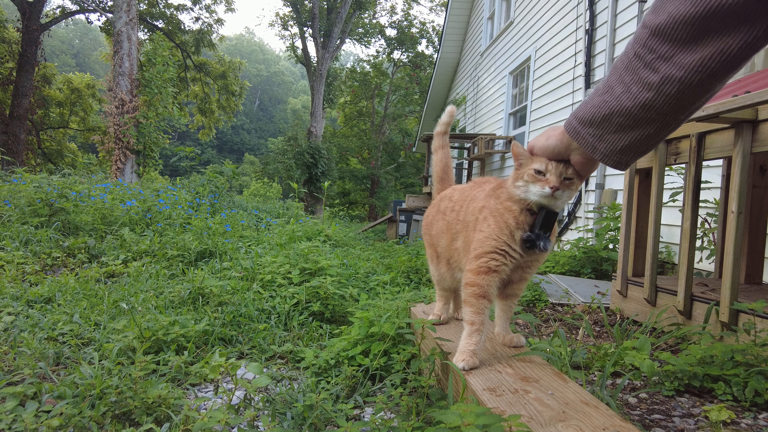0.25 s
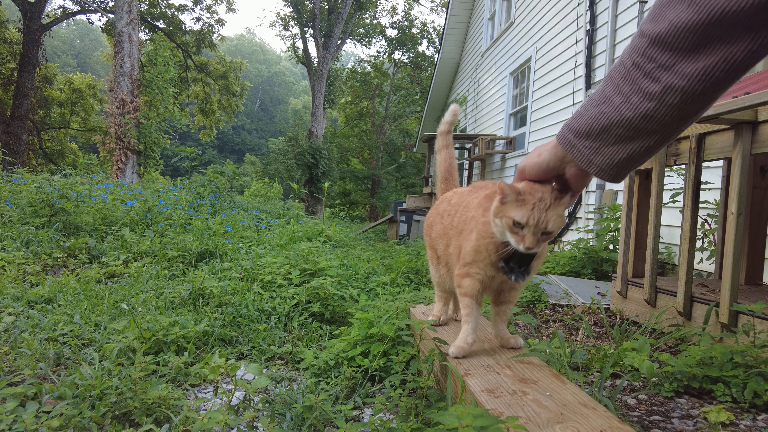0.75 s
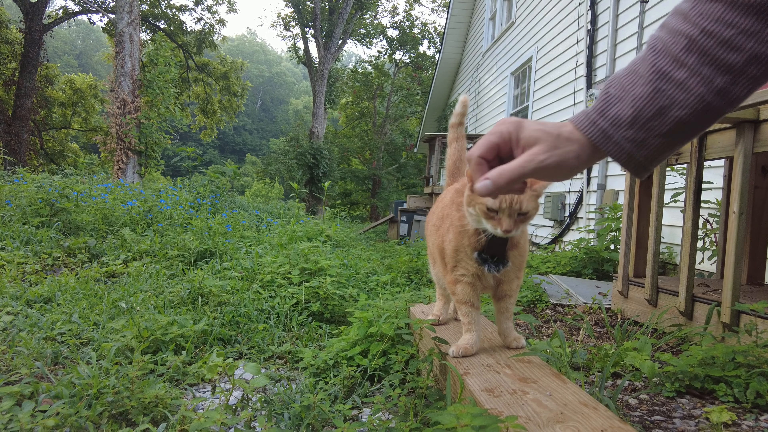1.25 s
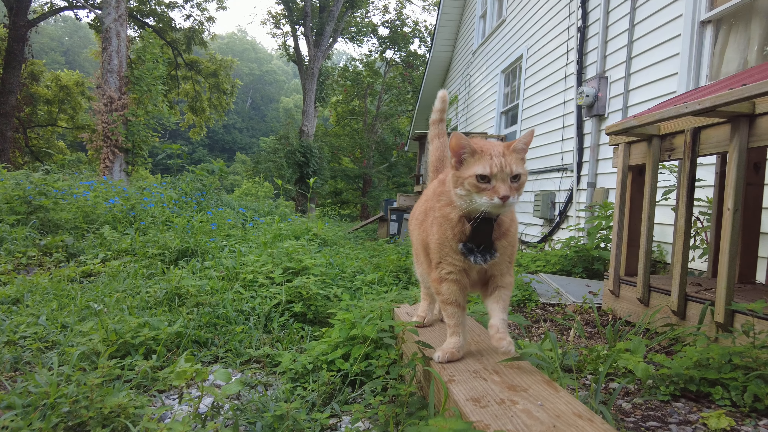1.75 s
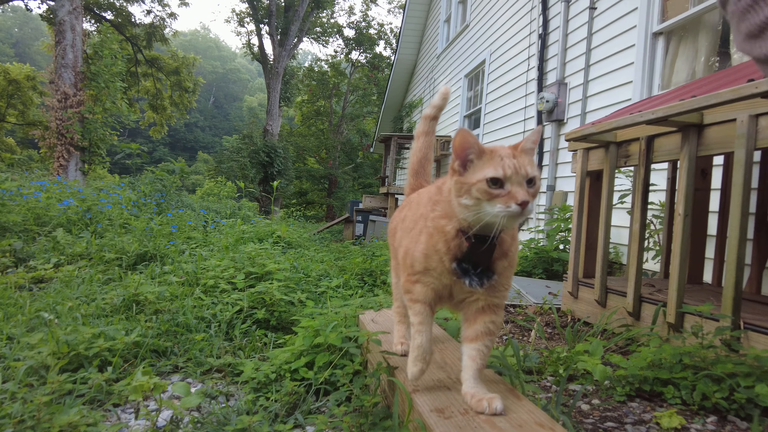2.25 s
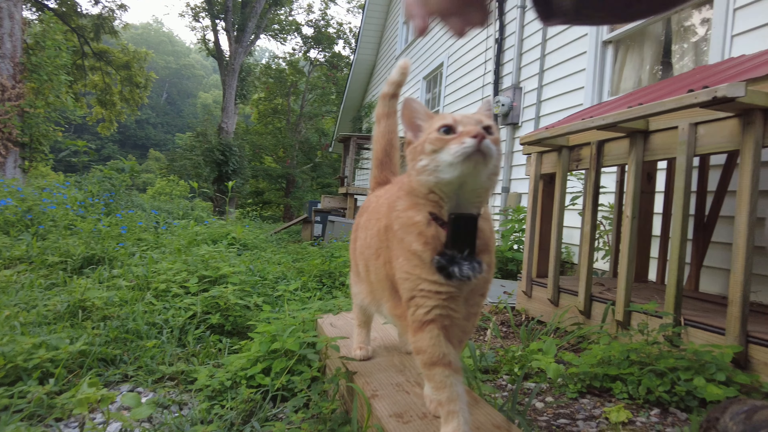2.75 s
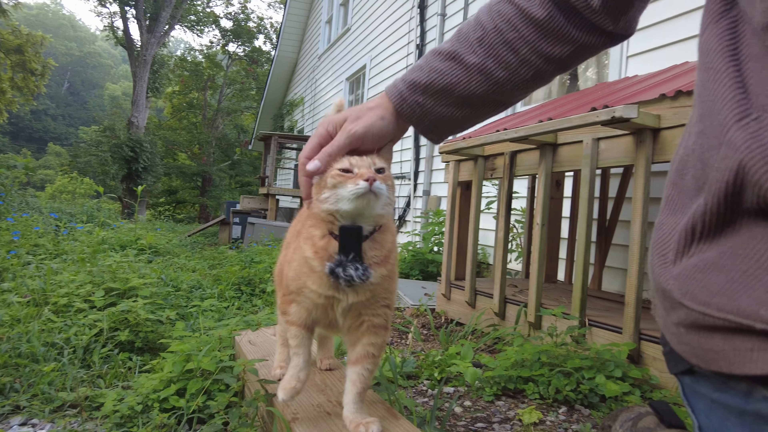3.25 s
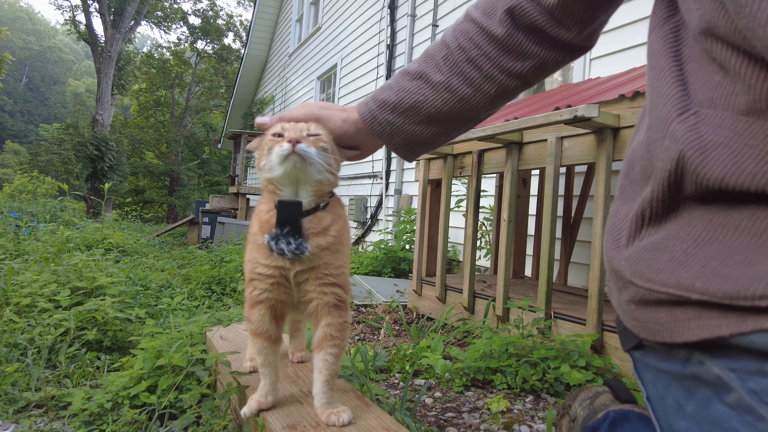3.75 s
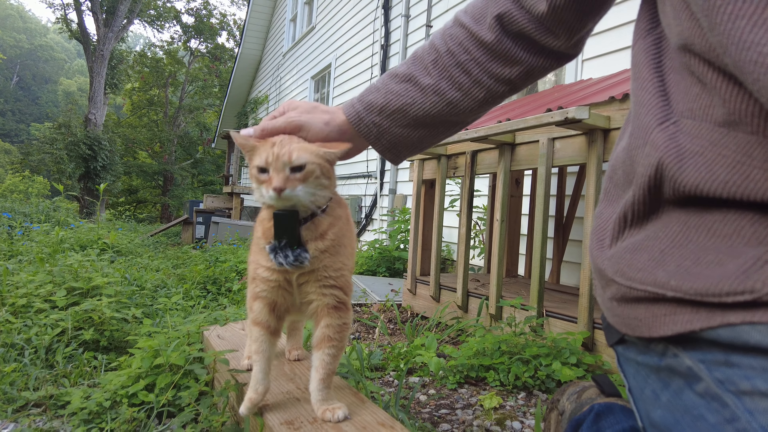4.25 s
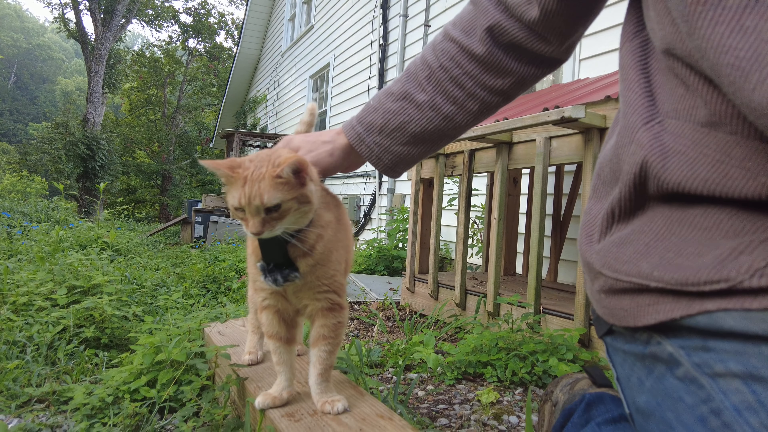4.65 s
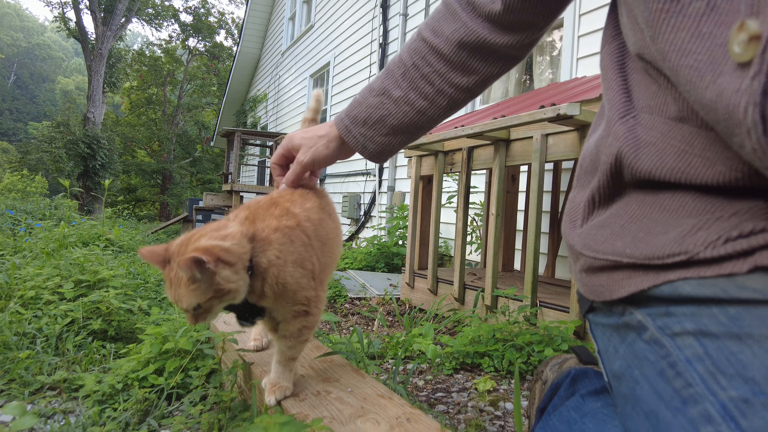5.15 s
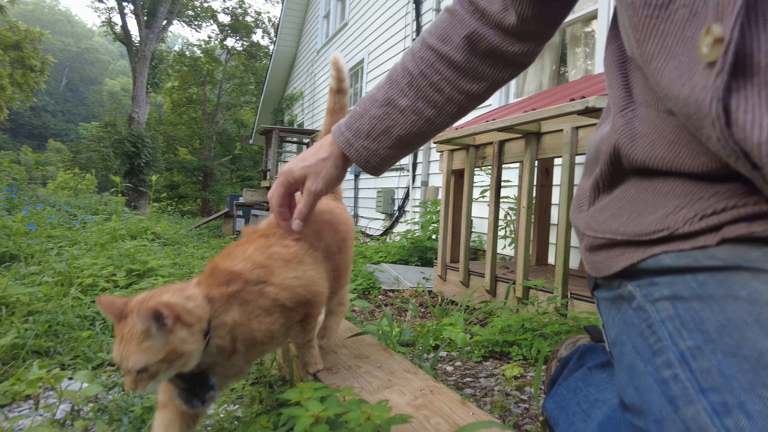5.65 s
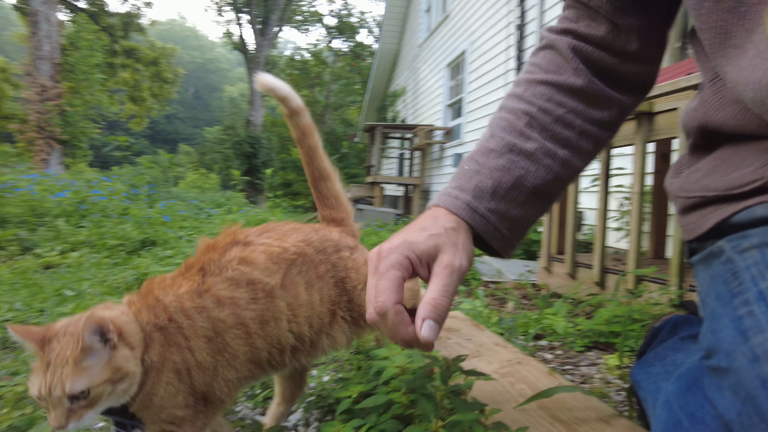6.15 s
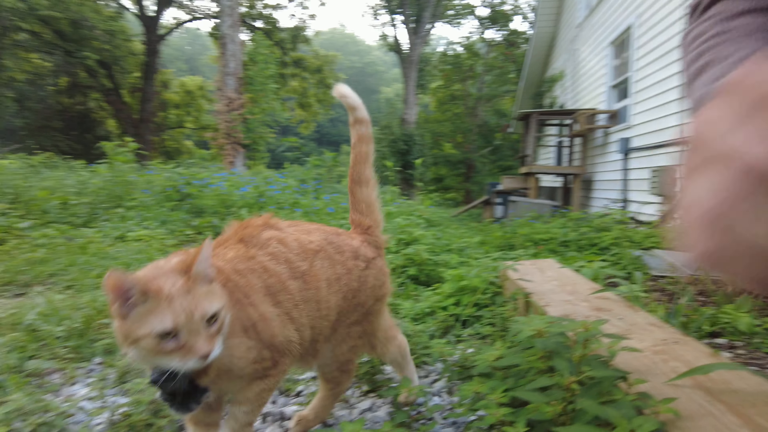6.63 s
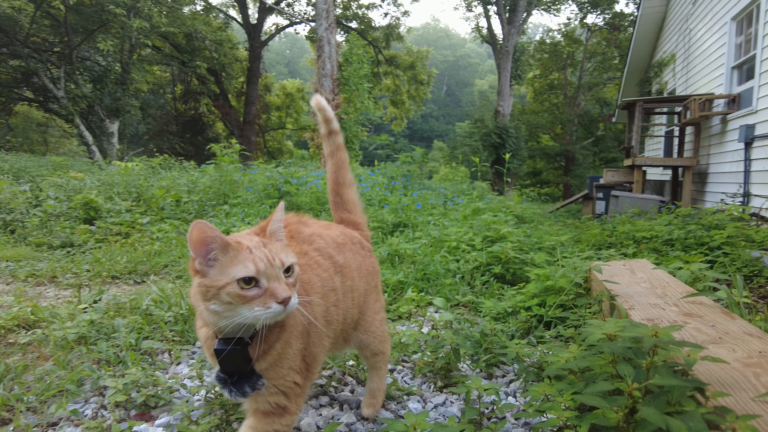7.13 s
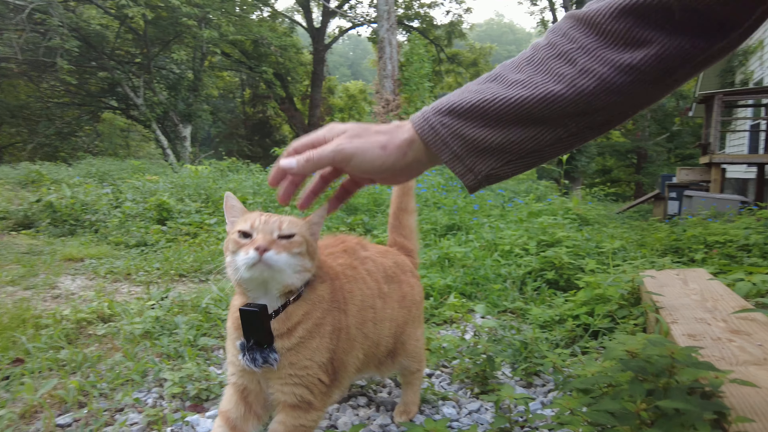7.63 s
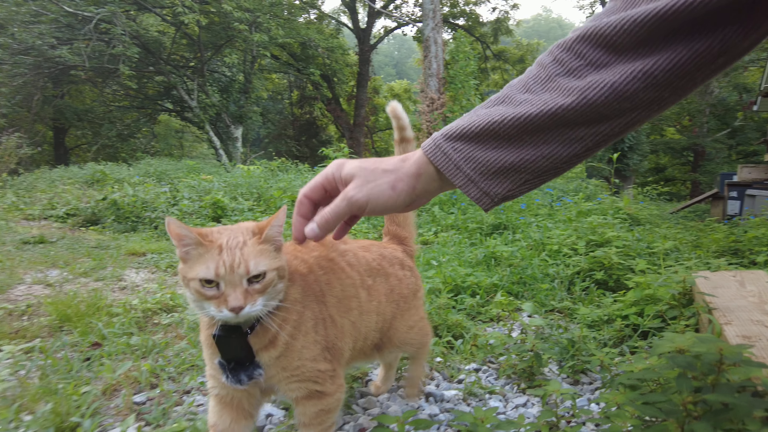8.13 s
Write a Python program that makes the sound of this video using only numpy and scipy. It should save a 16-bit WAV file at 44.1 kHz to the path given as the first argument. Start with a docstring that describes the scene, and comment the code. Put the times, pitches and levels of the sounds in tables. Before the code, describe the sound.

Close fluttering cat purr over a steady high insect chorus and deep wind rumble, with slurred bird whistles, then rustling steps and sharp gravel clicks.

```python
"""Crickets trill everywhere and a cat purrs close by, over a low rumble of air, in a summer yard beside a wood.
The purr is a train of puffs and pops, sounded by chest and nose; the trills are paired tone strokes and noise.
A songbird in the trees sings slurred syllables, mostly in pairs: gliding whistles with the echoes of the wood.
The cat is stroked, then steps off a plank onto weeds and gravel: noise with tiny catches.
A sleeve swishes past in smoother noise; snaps, dull taps and hard purr pulses are brief noise bursts."""
import sys
import numpy as np
from scipy import signal
from scipy.fft import rfft, irfft
from scipy.io import wavfile

SR = 44100
rng = np.random.default_rng(int(sys.argv[2]) if len(sys.argv) > 2 else 0)


def to_wav(s):
    """Save 16-bit WAV."""
    ch = np.atleast_2d(s).T  # columns
    pcm = np.round(np.clip(ch, -1, 1) * 32767)  # PCM
    wavfile.write(sys.argv[1], SR, pcm.astype(np.int16))


N = 369999
T = np.arange(N) / SR
HZ = np.fft.rfftfreq(N, 1 / SR)

# Spectra give shape only: the sound is scaled to its level afterwards.

# bouts of purring, levels before the trims in purr(): (time [s], length [s], chest level [dB],
# lift of the chest's bass [dB], nose level [dB], nasal resonance [Hz])
PURR_BOUTS = [(0, 1.0, -59.5, 1, -85, 1490), (1.02, 0.15, -56.5, -3, -60, 1540),
              (1.459, 0.4, -61.5, -7, -55.5, 1530), (2.032, 0.14, -52.5, -7, -51, 1460),
              (2.373, 0.93, -53.5, -7, -71, 1450), (3.585, .29, -54.5, -0.5, -62, 1260),
              (4.07, 0.8, -57.5, 1, -62, 1400), (5.088, 0.15, -59, 4.5, -74, 1410),
              (5.733, 0.89, -53, 1.5, -56, 1380), (6.61, 0.82, -54, 1.5, -52.5, 1390),
              (7.449, 0.54, -54, 5, -53, 1470), (8.2, 0.22, -55.5, 4, -60, 1540)]
PURR_ATTACK_S, PURR_RELEASE_S = 0.028, 0.059
CHEST_REST_DB, NOSE_REST_DB = -66, -78.5
PURR_BASS_HZ = 210  # the chest's bass lies below this
# mean flutter rate of the larynx: (time [s], rate [pulses/s])
PURR_RATE = [(0, 29.9), (3, 29.9), (6, 31), (6.75, 31), (7.2, 31.5), (7.6, 28.9), (8.39, 27)]
# spectrum of the cat's chest: (frequency [Hz], density [dB/Hz])
CHEST_SPECTRUM = [(60, 11), (150, 21.5), (240, 12), (330, 13), (420, 5), (520, 5), (850, -8.5), (1150, -27),
                  (1250, -4), (1700, -4.5), (2100, -17), (3000, -43), (5000, -17)]

# spells of rubbing on fur, cloth and leaves: (time [s], length [s], level [dB])
RUBS = [(0, 1.2, -69.5), (1.48, 0.59, -69), (2.03, 1.29, -68), (3.36, 1.555, -69), (5.11, 0.12, -69.5),
        (5.55, .05, -69.5), (5.71, 1.43, -66), (7.13, 1.3, -68.5)]
RUB_ATTACK_S, RUB_RELEASE_S, RUB_REST_DB = 0.025, 0.018, -76.5
# paws push into the weeds: (time [s], level [dB])
STEPS = [(6.01, -62), (6.15, -61), (6.27, -63), (6.36, -62.5), (6.43, -59.5), (6.66, -64), (6.92, -66),
         (7.02, -59.5), (7.61, -64)]
STEP_ATTACK_S, STEP_HOLD_S, STEP_RELEASE_S = 0.012, 0.039, 0.027
# spectrum of rubbing fur and leaves: (frequency [Hz], density [dB/Hz])
RUB_SPECTRUM = [(100, 4), (320, 5), (550, 5.5), (900, 3), (1400, 2.5), (2000, -1.5), (2900, 3), (4500, -2),
                (8000, -5), (12000, -16), (16000, -27)]
# the sleeve's one pass: time nearest, half width, level
SLEEVE_S, SLEEVE_WIDTH_S, SLEEVE_DB = 7.27, 0.14, -51
# spectrum of the sleeve: (frequency [Hz], density [dB/Hz])
SLEEVE_SPECTRUM = [(180, -36), (300, -5.5), (490, -10.5), (587, -12.5), (959, -18), (1290, -18),
                   (1850, -15), (4470, -13), (6400, -29), (7060, -21.5), (15000, -27.5)]

# dry snaps and clicks: (time [s], level [dB], decay time [s], brightness [dB/octave])
SNAPS = [(0.59, -42, 0.003, -9), (5.764, -45, 0.0087, -2), (6.0327, -23, 0.00083, -7),
         (6.037, -23, 0.0025, 19), (6.088, -41, .004, 0), (6.445, -36.5, 0.009, -4.5),
         (6.513, -42.5, 0.015, -8), (6.545, -43, .005, -2), (6.678, -38, 0.0044, -9), (6.744, -39, .002, 2),
         (6.91, -30, 0.0014, 4), (7.0177, -14, 0.00032, 0.5), (7.019, -20.5, 0.0015, 2),
         (7.0281, -21, 0.0016, -4), (8.04, -39, .002, -5), (8.114, -32, 0.0016, -5.5)]
# spectrum of a snap before its brightness tilt: (frequency [Hz], density [dB/Hz])
SNAP_SPECTRUM = [(300, -46), (1500, -16), (3000, 1), (4500, -2), (6000, 2), (7900, 4), (8700, 1),
                 (10000, 1), (13000, -4), (16000, -8)]
# soft dull taps and single hard pulses of the purr: (time [s], level [dB])
TAPS_AND_PULSES = [(0.589, -39.5), (1.028, -42.5), (2.07, -34.5), (2.128, -42), (2.617, -39), (3.733, -42),
                   (5.14, -45), (6.169, -36), (6.977, -35), (8.324, -40), (8.334, -38)]
# spectrum of a tap or hard purr pulse: (frequency [Hz], density [dB/Hz])
TAP_PULSE_SPECTRUM = [(150, -16), (500, 6.5), (900, -20), (1450, 1), (2000, -19), (2800, -12), (6000, -22),
                      (14000, -32)]

# the bird's syllables, one row a note, before each call's pitch ratio and level:
# (delay [s], length [s], start [Hz], middle [Hz], end [Hz], level [dB])
SWOOP = [(0, .18, 5690, 4760, 3050, 0), (.185, .043, 3360, 4110, 4450, 0)]
WHIP = [(0, 0.045, 7300, 7670, 8000, -16), (.037, 0.0296, 6150, 6000, 5870, 1),
        (.056, .057, 5850, 4430, 3260, -1.5), (.143, .016, 4930, 4906, 4750, 0)]
SEESAW = [(0, .098, 3650, 3338, 2934, -2), (.095, 0.102, 5400, 5500, 5360, -4.5),
          (.164, .03, 5800, 4410, 3410, 4)]
SLUR = [(0, .054, 4850, 4410, 3090, -0.5), (.06, 0.086, 3720, 3726, 3676, -7.5)]
WARBLE = [(0, .04, 7950, 7400, 7300, -10.5), (.083, .04, 5610, 5000, 4750, 4),
          (.122, 0.0353, 4740, 5230, 5470, -0.5)]
DROP = [(0, 0.084, 6500, 4570, 4200, 0)]
WHISTLE = [(0.0023, .09, 2550, 3030, 3020, 0)]
RISE = [(0, .12, 1950, 2700, 2980, 0)]
DIP = [(0, .18, 2770, 2400, 3400, 0)]
CHIP = [(0, 0.022, 7200, 7330, 8200, 0)]
# bird calls: (time [s], syllable, pitch ratio [1], level [dB])
SONG = [(.257, RISE, 1, -55), (.55, DROP, 0.76, -56), (1.41, CHIP, .7, -45), (1.65, SWOOP, 0.96, -38),
        (1.98, WHIP, 0.98, -31.5), (2.219, WHIP, 1, -32), (2.184, DIP, 1, -57.5),
        (2.492, SEESAW, 0.99, -40), (2.742, SEESAW, 0.99, -39), (3.193, SLUR, 0.94, -37),
        (3.517, CHIP, 1.045, -39), (3.544, SLUR, .96, -37.5), (3.829, WARBLE, 1.02, -38),
        (4.056, WARBLE, 1.02, -39.5), (4.08, DROP, .8, -52.5), (4.301, DROP, 0.95, -42.5),
        (4.384, WHISTLE, 1, -45.5), (4.585, WHISTLE, 0.99, -49), (4.802, WHISTLE, 1, -50),
        (5.456, CHIP, 1.06, -48), (6.36, DIP, 0.97, -57), (7.669, CHIP, 1.04, -38),
        (7.723, CHIP, 0.74, -47), (8.218, CHIP, 1.1, -53)]

# near crickets, levels before their common swell:
# (stroke pairs [1/s], top pitch [Hz], pitch fall [Hz], level [dB], lag of the left ear [ms])
NEAR_CRICKETS = [(18.8, 6880, 800, -50.5, .01), (17.9, 6650, 850, -53.5, .07), (25.0, 6450, 800, -54, -.06)]
# common swell of the near crickets: (time [s], level [dB])
NEAR_DB = [(0, -5.5), (2.5, 0), (5, -3.5), (8.39, -7.5)]
# two low-pitched crickets together: (time [s], level [dB])
LOW_CRICKET_DB = [(0, -61), (4.5, -75), (6.5, -58.5), (7.6, -50.5), (8.39, -51)]
# spectrum of the far insects: (frequency [Hz], density [dB/Hz])
CHORUS_SPECTRUM = [(3800, -30.5), (4100, -15), (4400, -4), (4750, -1), (5200, -8), (5700, -1), (6100, 4),
                   (6600, 2), (6780, -12), (6980, -12), (7700, -14), (8500, -56)]
# far insects: (time [s], level [dB])
CHORUS_DB = [(0, -43.5), (1.5, -43.5), (4, -41), (5.5, -43), (8.39, -43.5)]

# spectrum of the moving air's rumble: (frequency [Hz], density [dB/Hz])
RUMBLE_SPECTRUM = [(8.8, -25), (15, -2), (37, 1), (65, -3), (100, -5), (159, -12.5), (184, -17.5),
                   (334, -26.5), (392, -30.5), (587, -42.5), (700, -56), (910, -74), (1540, -120)]
# moving air: (time [s], level [dB])
WIND_DB = [(0, -32), (1, -34.5), (1.7, -30.5), (2.2, -35), (3, -33), (3.6, -36.5), (4.2, -33.5), (4.7, -35),
           (5.3, -33.5), (6.5, -34), (7.2, -32), (8.39, -33.5)]
# spectrum of the air's faint hiss: (frequency [Hz], density [dB/Hz])
AIR_SPECTRUM = [(300, -1), (700, 3.5), (1500, -1), (3500, -8), (7600, -13), (8400, -1.5), (10000, -2.5),
                (12000, 2), (13800, -7), (15500, 4)]
AIR_DB = -55.5
# likeness of left and right in noise from all around: (frequency [Hz], correlation [-1..1])
EAR_CORRELATION = [(30, 0.96), (92, 1), (140, 0.93), (210, 0.95), (330, 0.49), (500, 0.56), (770, -0.49),
                   (1170, -0.17), (1800, 0.31), (2700, 0.11), (4200, -0.25), (6400, 0.025), (10000, -0.22),
                   (15000, 0.036)]
EDGE_HZ = 15850  # upper band edge of the recorder


def amp(db):
    """Logarithmic level: decibels become an amplitude gain."""
    return 10 ** (np.asarray(db) / 20)


def evened(x):
    """Normalization: scales to an rms value of 1."""
    return x / np.sqrt(np.mean(x ** 2) + 1e-20)


def read(points, hz):
    """Interpolation: reads a table on a logarithmic frequency axis."""
    f, value = np.transpose(points)
    return np.interp(np.log(hz + 1), np.log(f + 1), value)


def curve(rows):
    """Interpolation: reads a control curve at every sample."""
    return np.interp(T, *np.transpose(rows))


def add(mix, s, sound):
    """Superposition: mixes a sound (channels x samples) in at time s."""
    part = mix[:, max(round(s * SR), 0):][:, :sound.shape[1]]
    part += sound[:, :part.shape[1]]


def swells(rows, attack_s, release_s):
    """Addition of powers: gain of events (s, length s, dB) that each rise, hold and die away."""
    power = np.zeros(N)
    for s, length, db in rows:
        t = T[:int((length + 6 * release_s) * SR)]
        rise = np.minimum(t / attack_s, 1)
        fall = np.exp(-np.maximum(t - length, 0) / release_s)
        gain = amp(db) * rise * fall
        add(power[None], s, gain[None] ** 2)
    return np.sqrt(power)


def drift(hz):
    """Random fluctuation: low-passed noise of rms 1, up to about hz."""
    return evened(irfft(rfft(rng.standard_normal(N)) * np.exp(-(HZ / hz) ** 2), N))


def colour(x, spectrum):
    """Linear filtering: shapes by a spectrum, keeping the power of white noise."""
    return irfft(rfft(x) * evened(amp(read(spectrum, HZ))), N)


def field(spectrum, envelope=1):
    """Partial coherence: noise from all around whose likeness in the two ears varies with frequency."""
    a, b = rfft(rng.standard_normal((2, N)) * envelope)
    same = np.clip(read(EAR_CORRELATION, HZ), -1, 1)
    right = same * a + np.sqrt(1 - same ** 2) * b
    return colour(irfft(np.array([a, right]), N), spectrum)


def band_rms(x, lo_hz, hi_hz):
    """Band level: rms strength of a sound between two frequencies."""
    return np.std(irfft(rfft(x) * ((HZ > lo_hz) & (HZ < hi_hz)), N))


def resonate(x, hz, width):
    """Heterodyning: shifts the curve hz to zero, smooths twice and shifts back, a moving resonance."""
    turn = np.exp(2j * np.pi * np.cumsum(hz) / SR)
    r = np.exp(-np.pi * width / SR)
    smooth = signal.lfilter([(1 - r) ** 2], [1, -2 * r, r * r], x / turn)
    return (turn * smooth).real


def place(x, lag_ms):
    """Interaural delay: the left ear lags for a sound from the right, and leads if lag_ms is negative."""
    left = irfft(rfft(x) * np.exp(-2j * np.pi * HZ * lag_ms / 1000), N)
    return np.array([left, x])


def scatter(x, t60, wet_db, build_s=0.0006):
    """Multiple scattering: sparse echoes of trunks, leaves and house wall, distinct in each ear, build and die."""
    t = np.arange(SR) / SR
    taps = rng.standard_normal((2, SR)) * (rng.random((2, SR)) < 0.05) * (t > 0.002)
    taps = taps * np.exp(-np.log(1000) * t / t60) * (1 - np.exp(-t / build_s))
    taps /= np.linalg.norm(taps, axis=1, keepdims=True)
    return x + amp(wet_db) * signal.fftconvolve(x, taps, axes=1)[:, :N]


def purr(puff_s=0.0038, between=0.29, chest_db=-1, nose_db=-7.5, nose_width=330, uneven_db=2.0):
    """Pulse excitation: each flutter of the larynx sends a puff into the chest and a pop that rings in the nose."""
    start, length, chest_dbs, bass_dbs, nose_dbs, nose_hz = np.transpose(PURR_BOUTS)
    chest_dbs = chest_dbs + chest_db  # trims of all the bouts
    nose_dbs = nose_dbs + nose_db

    def gain(rest_db, dbs):
        """Superposition of levels: the bouts rise from a resting amplitude."""
        return amp(rest_db) + swells(zip(start, length, dbs), PURR_ATTACK_S, PURR_RELEASE_S)

    chest_gain = gain(CHEST_REST_DB, chest_dbs)
    bass_gain = gain(CHEST_REST_DB, chest_dbs + bass_dbs)
    nose_gain = gain(NOSE_REST_DB, nose_dbs)

    rate = curve(PURR_RATE) * (1 + 0.01 * drift(20))
    turns = np.cumsum(rate) / SR
    force = amp(uneven_db * drift(41))
    puffs = np.exp(-(turns % 1) / rate / puff_s)
    chest = field(CHEST_SPECTRUM, (between + puffs) * force)  # some noise remains between puffs
    chest = chest / band_rms(chest, 272, 650)
    bass = irfft(rfft(chest) / (1 + (HZ / PURR_BASS_HZ) ** 6), N)

    pops = np.diff(np.floor(turns), prepend=0) * force
    resonance_hz = np.interp(T, start + length / 2, nose_hz) * (1 + 0.019 * drift(40))
    nose = resonate(pops, resonance_hz, nose_width)
    nose = scatter(place(nose, lag_ms=0.062), t60=0.071, wet_db=1)
    return bass_gain * bass + chest_gain * (chest - bass) + nose_gain * evened(nose)


def rustle(grains_per_s=120, grain_db=4):
    """Friction noise: fur and trodden leaves hiss with tiny catches; a smoother swish rises as a sleeve passes."""
    sizes = amp(grain_db * np.minimum(rng.exponential(1, N), 3)) * (rng.random(N) < grains_per_s / SR)
    catches = signal.lfilter([1], [1, -np.exp(-1 / (0.00069 * SR))], sizes)  # each decays in 0.69 ms
    fur = field(RUB_SPECTRUM, 1 + 0.56 * catches)
    sleeve = field(SLEEVE_SPECTRUM, 1 + 0.18 * catches)
    rubs = swells(RUBS, RUB_ATTACK_S, RUB_RELEASE_S)
    steps = swells([(s, STEP_HOLD_S, db) for s, db in STEPS], STEP_ATTACK_S, STEP_RELEASE_S)
    contact = np.sqrt(amp(RUB_REST_DB) ** 2 + rubs ** 2 + steps ** 2)
    passing = amp(SLEEVE_DB) / (1 + ((T - SLEEVE_S) / SLEEVE_WIDTH_S) ** 6)
    return contact * fur / band_rms(fur, 2003, 2482) + passing * sleeve / band_rms(sleeve, 1850, 2660)


def crack(decay_s, spectrum, tilt_db, shared=0.25, swell=0.12):
    """Transient radiation: a burst of coloured noise, partly shared by the ears, swells and dies fast."""
    t = np.arange(4096) / SR
    hz = np.fft.rfftfreq(len(t), 1 / SR)
    noise = rng.standard_normal((3, len(t)))
    shape = evened(amp(read(spectrum, hz) + tilt_db * np.log2((hz + 500) / 6000)))
    envelope = np.exp(-t / decay_s) * (1 - np.exp(-t / (swell * decay_s)))
    burst = irfft(rfft(shared * noise[2] + 0.5 * noise[:2]) * shape) * envelope
    return evened(burst) * np.sqrt(np.mean(np.exp(-2 * t / decay_s)))  # its energy grows with its length


def clicks():
    """Transient excitation: twigs and gravel snap; soft dull taps and hard purr pulses sound from the cat."""
    out = np.zeros((2, N))
    for s, db, decay_s, tilt_db in SNAPS:
        add(out, s, amp(db) * crack(decay_s, SNAP_SPECTRUM, tilt_db))
    for s, db in TAPS_AND_PULSES:
        add(out, s, amp(db) * crack(0.0031, TAP_PULSE_SPECTRUM, 0))
    return scatter(out, t60=0.13, wet_db=-7.5)


def bird(waver=0.011, gain_db=0):
    """Frequency modulation: whistles glide through three pitches, blurred by foliage and echoed by the wood."""
    song = np.zeros((1, N))
    unsteady = 1 + waver * drift(165)
    for s, syllable, pitch, call_db in SONG:
        for delay, length, start, middle, end, db in syllable:
            u = np.linspace(0, 1, max(int(length * SR), 8))
            glide = np.polyval(np.polyfit([0, 0.5, 1], [start, middle, end], 2), u)
            hz = pitch * glide * unsteady[int((s + delay) * SR):][:len(u)]
            note = signal.windows.tukey(len(u), 0.4) * np.sin(2 * np.pi * np.cumsum(hz) / SR)
            add(song, s + delay, amp(call_db + db) * note[None])
    direct = amp(gain_db) * place(song[0], lag_ms=0.11) * amp([[-1.5], [1.5]])  # louder at the right
    near = scatter(direct, t60=0.09, wet_db=-6)
    return scatter(near, t60=0.8, wet_db=-5, build_s=0.012)


def cricket(rate, top_hz, fall_hz, db, lag_ms, second_at=0.45, stroke_s=0.008):
    """Stridulation: wing strokes come in pairs; the scraper slows along the file, so the pitch falls in each."""
    cycle = (np.cumsum(rate * (1 + 0.015 * drift(1.5) + 0.03 * drift(25))) / SR + rng.random()) % 1
    age = np.where(cycle < second_at, cycle, cycle - second_at) / rate
    stroke = np.minimum(age / stroke_s, 1)
    hz = top_hz - fall_hz * stroke + 70 * drift(29.86)
    tone = np.sin(2 * np.pi * np.cumsum(hz) / SR)
    song = np.sin(np.pi * stroke) * tone * amp(1.0 * drift(2.5))
    return amp(db) * evened(scatter(place(song, lag_ms), t60=0.15, wet_db=-6))


def insects():
    """Incoherent summation: countless far trills merge into bands of noise; a few nearer singers stand out."""
    far = amp(curve(CHORUS_DB) + 0.76 * drift(49)) * field(CHORUS_SPECTRUM) * amp([[-0.5], [0.5]])
    low = evened(cricket(27, 4700, 420, 0, 0.04) + cricket(33, 4780, 450, 0, -0.04))
    near = sum(cricket(*row) for row in NEAR_CRICKETS)
    return far + amp(curve(LOW_CRICKET_DB)) * low + amp(curve(NEAR_DB)) * near


def breeze():
    """Broadband flow noise: moving air gives a lumpy low rumble and a faint even hiss."""
    level = amp(curve(WIND_DB) + 0.5 * drift(20))
    rumble = level * field(RUMBLE_SPECTRUM) * amp([[-0.7], [0.7]])
    return rumble + amp(AIR_DB) * field(AIR_SPECTRUM)


def scene():
    """Superposition: the sum of all that sounds in the yard."""
    return purr() + rustle() + clicks() + bird() + insects() + breeze()


def record(dry):
    """Low-pass filtering: the recorder's band limit."""
    lowpass = signal.firwin(511, EDGE_HZ, window=("kaiser", 9), fs=SR)
    return signal.oaconvolve(dry, lowpass[None], "same")


dry = scene()
out = record(dry)
to_wav(out)
```